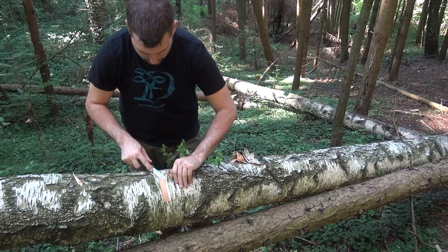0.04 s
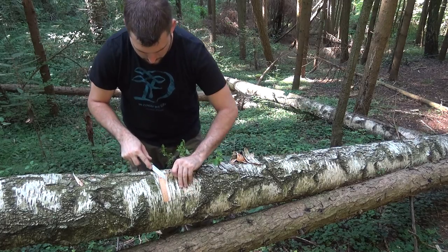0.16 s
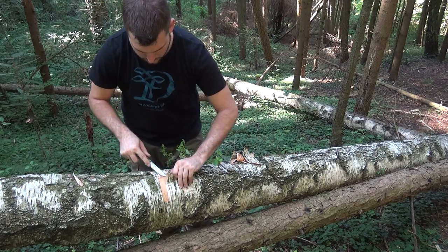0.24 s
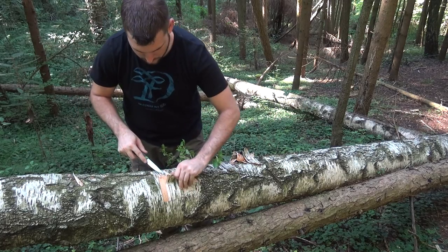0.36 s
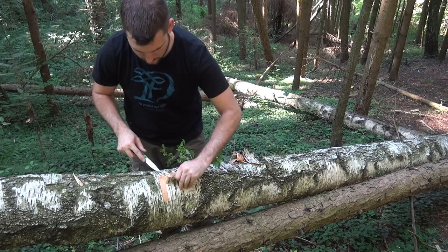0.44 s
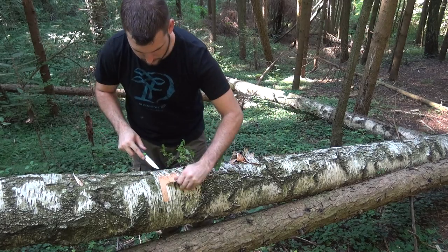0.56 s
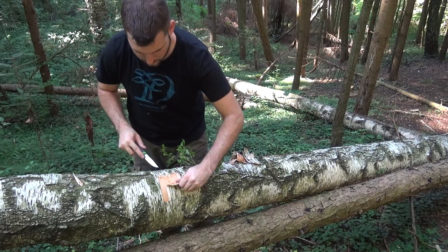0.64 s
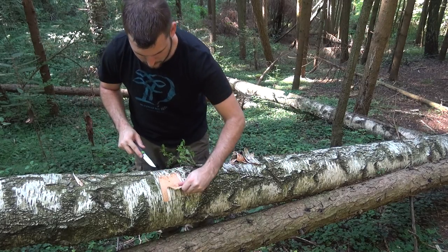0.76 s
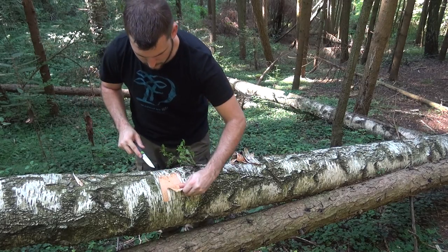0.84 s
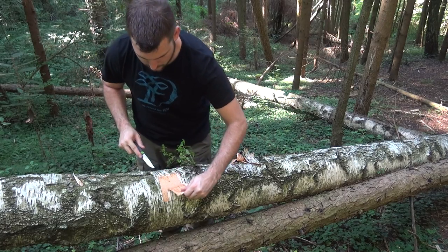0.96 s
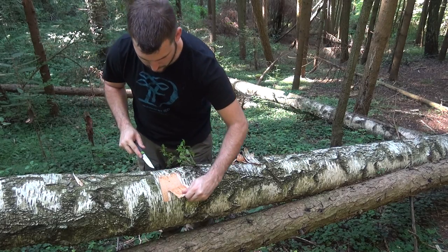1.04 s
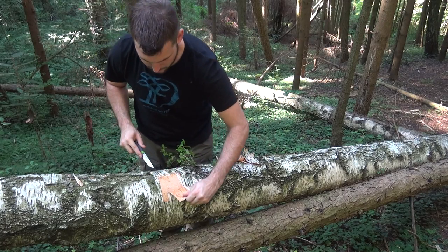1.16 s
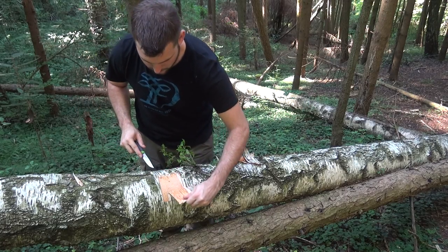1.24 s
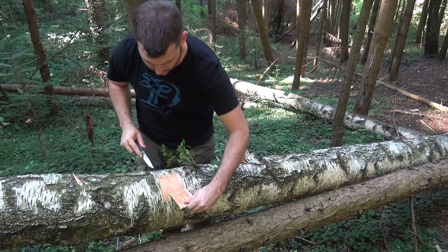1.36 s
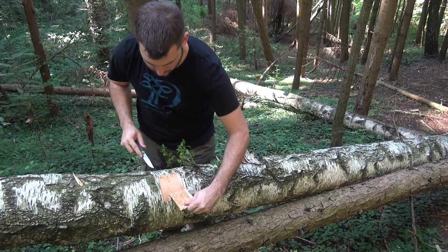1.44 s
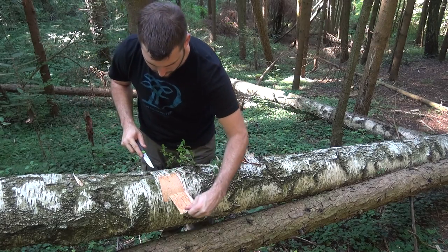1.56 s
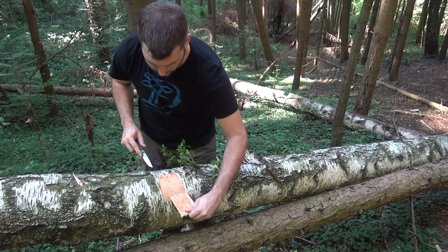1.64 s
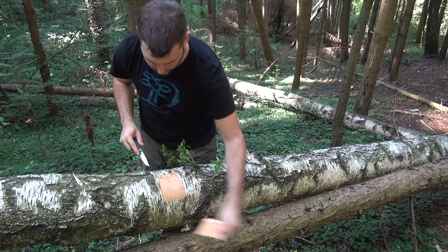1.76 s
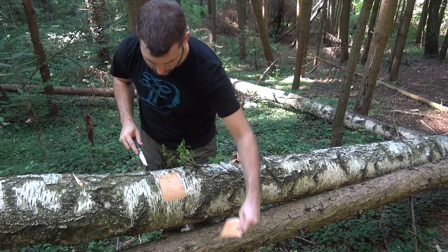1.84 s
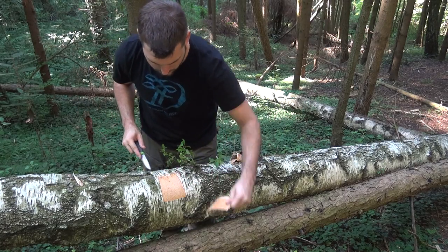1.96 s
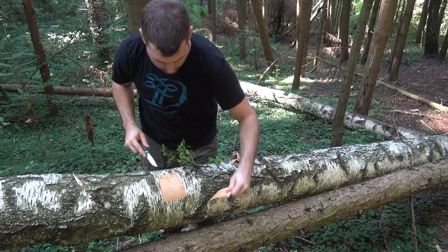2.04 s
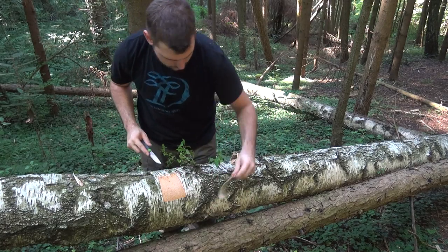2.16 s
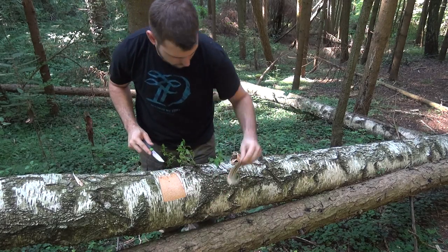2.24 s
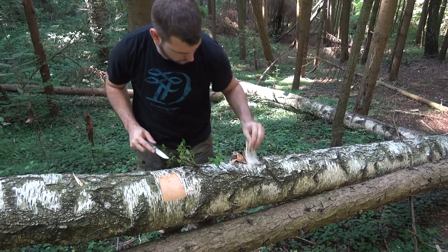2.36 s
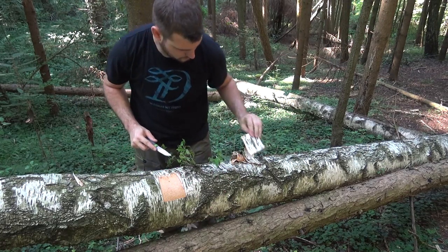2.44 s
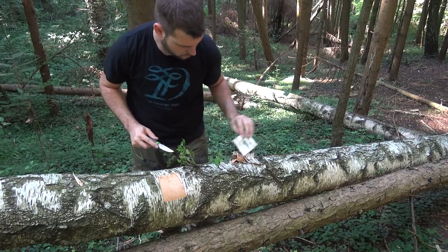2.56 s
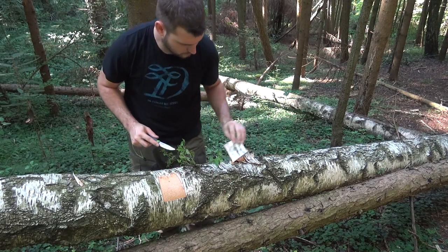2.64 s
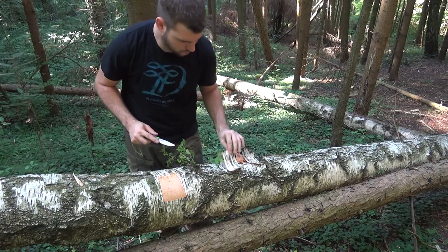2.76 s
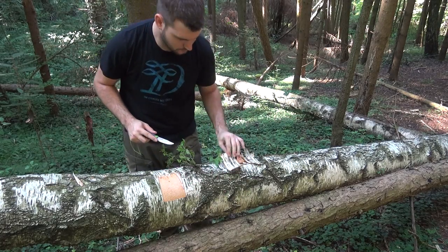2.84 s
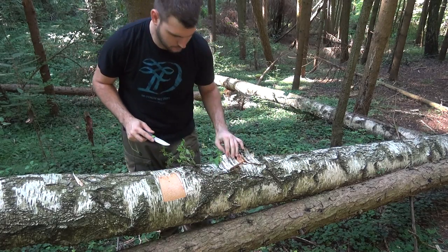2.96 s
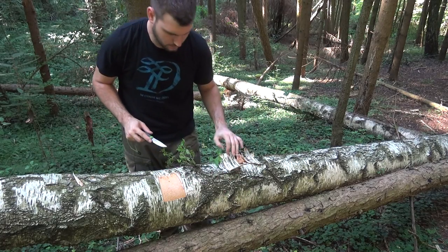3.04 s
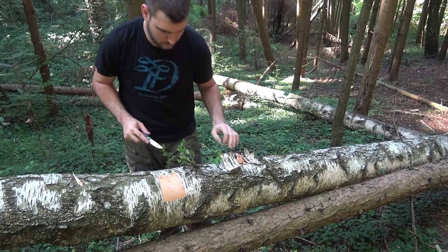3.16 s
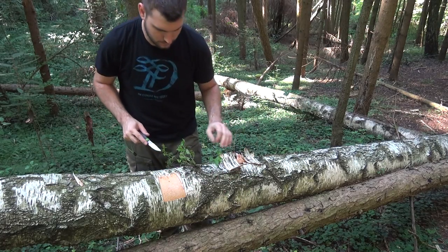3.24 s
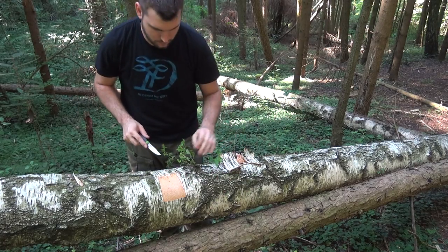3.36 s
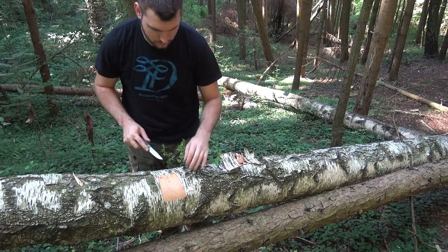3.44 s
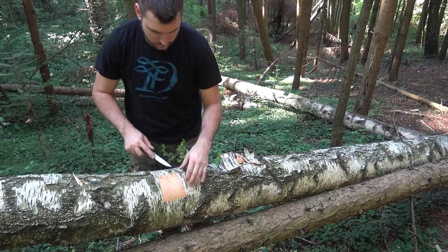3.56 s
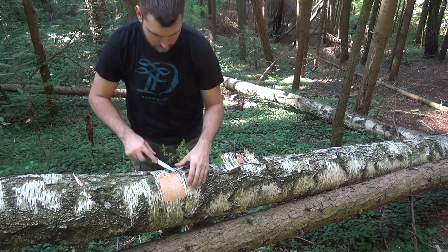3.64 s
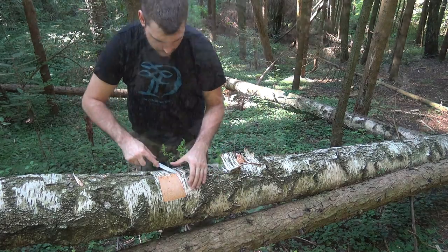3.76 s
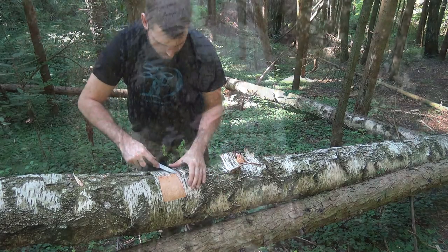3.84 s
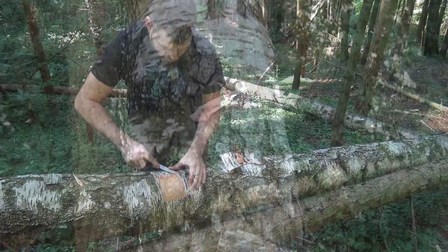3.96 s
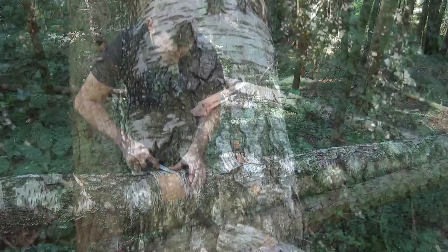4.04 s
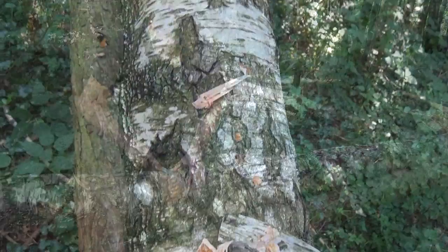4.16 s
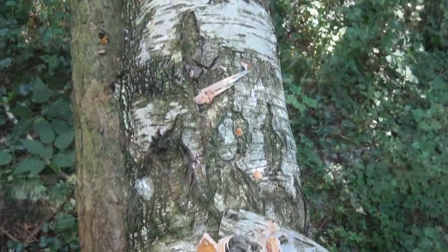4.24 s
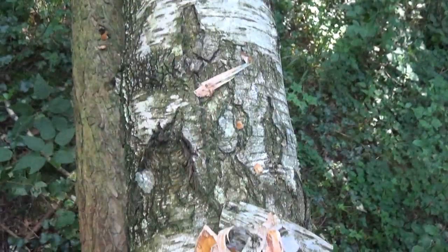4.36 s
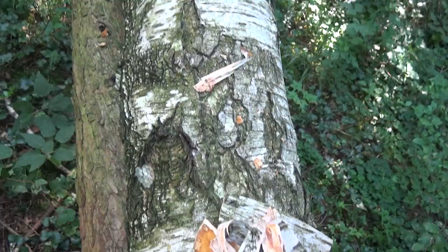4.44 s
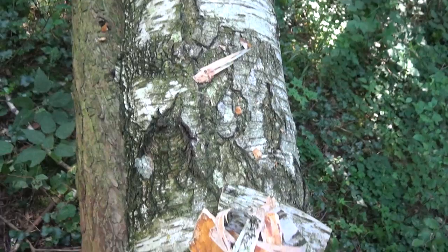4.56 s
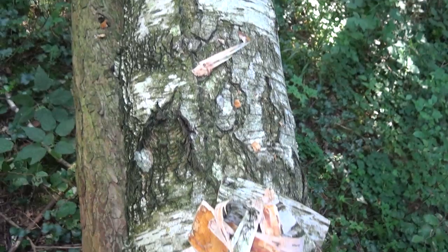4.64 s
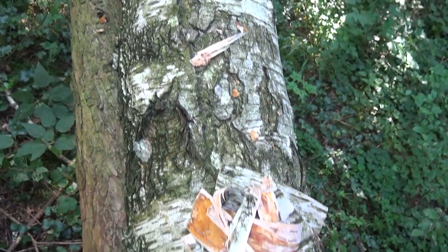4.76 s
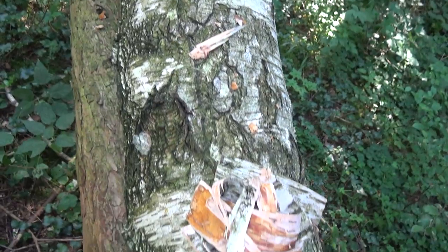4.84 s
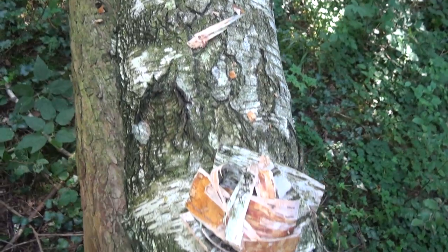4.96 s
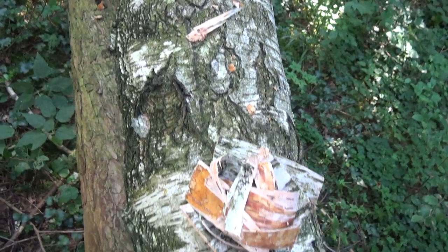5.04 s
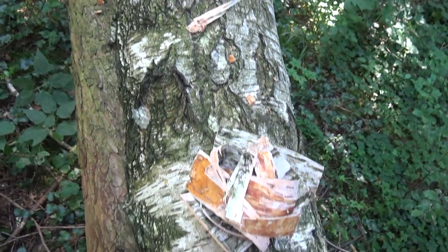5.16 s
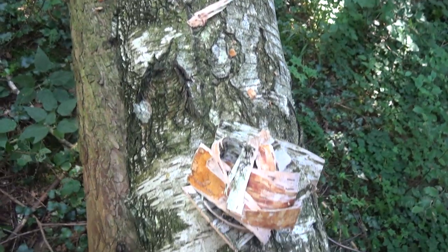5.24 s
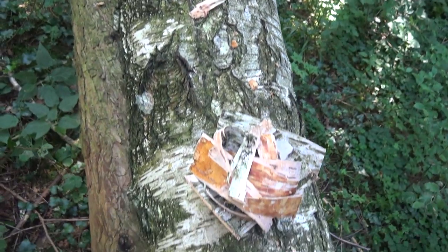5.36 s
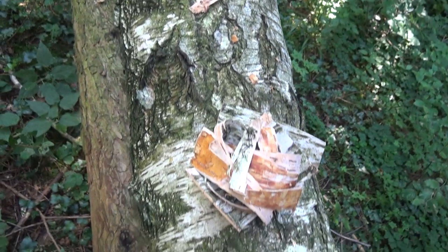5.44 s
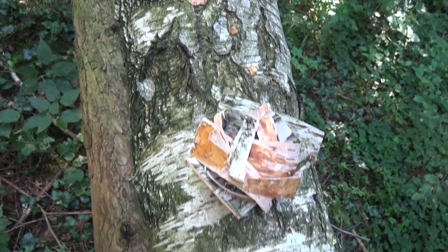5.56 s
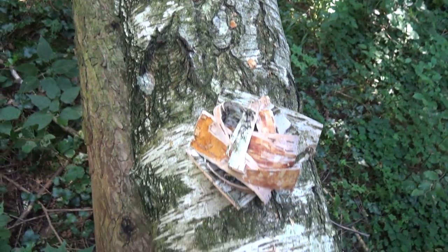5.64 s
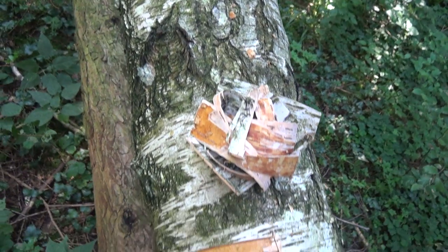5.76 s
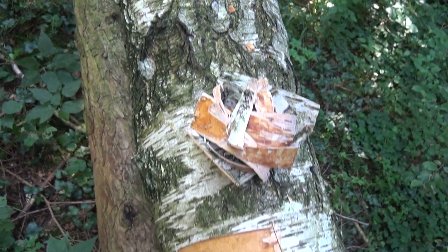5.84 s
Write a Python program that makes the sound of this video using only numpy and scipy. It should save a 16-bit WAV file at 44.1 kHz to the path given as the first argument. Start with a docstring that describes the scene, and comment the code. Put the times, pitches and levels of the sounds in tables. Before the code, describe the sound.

Outdoor stereo microphone near a fallen birch trunk. A knife and hand rasp, snap and tick the bark until a strip breaks away with a sharp dominating crack and short woody echo. Soft taps and scrapes follow, then another crisp snap. Clear rising bird whistles come early, high trills in the middle, three quick chips later. A faint far engine hums under the first airy background, which crossfades into a slightly hollow one.

```python
"""Peeling birch bark in the woods

A knife lifts a strip of birch bark off a fallen trunk: it ticks, fizzes, tears off with one loud crack, is
laid down, and the blade snaps in again. Pops, noise sprays and filtered grit make the bark; gliding sines
make small birds and a far engine; coloured stereo noise makes two forest airs, the second fading in under
the first, which fades out near the end. Decaying noise gives the wood's answer."""
import sys
import numpy as np
from scipy import signal
from scipy.fft import rfft, irfft, next_fast_len
from scipy.io import wavfile
from scipy.ndimage import map_coordinates

SR = 44100
rng = np.random.default_rng(int(sys.argv[2]) if len(sys.argv) > 2 else 0)


def bounce(signal):
    """Save signal as a 16-bit WAV file at the path given by the first command-line argument."""
    frames = np.transpose(np.atleast_2d(signal))
    limited = np.clip(frames, -1, 1)
    pcm = np.round(limited * 32767).astype(np.int16)
    wavfile.write(sys.argv[1], SR, pcm)


N = 260190

# Colour of each forest air: (frequency [Hz], level per Hz [dB])
AIR_FIRST = [(20, -10), (40, -8), (60, 0), (90, -1.5), (140, -9), (320, -11), (500, -17.5), (730, -16),
             (950, -21), (1150, -16.5), (2100, -21), (3100, -28.5), (7000, -23.5), (15500, -41.5)]
AIR_SECOND = [(12, -49), (20, -22.5), (60, 3), (198, -9), (310, -9), (377, -18.5), (558, -11.5), (849, -25),
              (1330, -11), (1480, -17.5), (1660, -14.5), (2990, -26.5), (3530, -27), (4060, -26),
              (16000, -32.5)]
# A faint hollow drone in the second air: (frequency [Hz], width [Hz], level [dB])
HOLLOW = [(622, 400, -9), (1089, 31, -3), (1328, 60, 1.5), (1693, 39, -6.5), (2170, 47, -14)]
# Likeness of left and right in each air: (frequency [Hz], correlation [-1 to 1])
ALIKE_FIRST = [(60, 0.81), (150, 0.83), (380, 0.3), (950, -0.0), (2380, 0.79), (5980, 0.21), (15000, 0)]
ALIKE_SECOND = [(60, 0.79), (180, 0.65), (550, -0.47), (1650, -0.42), (4970, 0.5), (15000, -0.066)]
# Balance of each air: (frequency [Hz], left minus right [dB])
LEAN_FIRST = [(60, -10.5), (110, -3.5), (200, -6), (380, -6.5), (700, -6.5), (1290, -9), (2380, -7),
              (4400, -6), (8120, 3), (15000, -17.5)]
LEAN_SECOND = [(60, -12.5), (110, -1.5), (200, -10), (380, -4.5), (700, -5.5), (1290, -7.5), (2380, -9),
               (4400, -5.5), (8120, 5), (15000, -12.5)]
# A far engine speeds up: (time [s], frequency [Hz], level [dB])
RUMBLE = [(.5, 59.5, -54), (2.1, 62, -58.5), (3.1, 71, -56.5), (4.3, 72, -54)]
# The near bird's whistle dips, then rises: (time into whistle [s], frequency [Hz], level [dB])
WHISTLE = [(0, 4340, -16), (.013, 3500, -12), (.028, 3290, -13), (.055, 4450, -2), (.09, 4795, -1.5),
           (.17, 5190, -2), (.197, 5580, -4), (.215, 6470, -7), (.224, 6900, -35)]
# Its falling afternote: (time into note [s], frequency [Hz], level [dB])
FALL = [(0, 6700, -18), (.012, 6900, -8), (.026, 8200, -10), (.04, 6900, -1), (.06, 5400, 2),
        (.09, 5350, -6), (.125, 5400, -29)]
# One row a repeat: (level [dB], pitch [factor], afternote relative to whistle [dB])
VERSES = [(-48, .96, -2.5), (-47, .985, -5), (-46.5, 0.98, -3.5), (-48, 0.98, -11.5)]
# Soft low shuffling: (time [s], length [s], level [dB])
SHUFFLES = [(.05, 0.45, -62), (.85, 0.34, -64.5), (3.45, .4, -60), (3.9, .55, -62.5)]
# Hand and blade rub over the bark: (time [s], length [s], level [dB])
SCRAPES = [(.125, 0.041, -52), (2.122, 0.052, -54), (2.367, 0.043, -58), (3.53, 0.77, -69),
           (4.16, 0.065, -55), (4.26, 0.33, -68)]
# Tugs at the strip rasp: (time [s], length [s], level [dB])
TUGS = [(.36, .17, -54.5), (.52, 0.15, -61), (1.095, 0.077, -54), (1.542, .1, -51), (1.738, 0.021, -39.5)]
# The loose strip slides to rest: (time [s], length [s], level [dB])
LAY_DOWN = [(2.786, 0.046, -50.5)]
# Bark snaps: a flake breaks off, and later the blade snaps into the bark; splinters and knock are relative to
# the snap: # (time [s], level [dB], pitch [Hz], splinters [dB], knock [dB], knock pitch [Hz])
SNAPS = [(0.7236, -17.5, 5840, -11, -21, 1745), (2.078, -26, 7300, -10.5, -30, 3000),
         (4.1855, -25, 7500, -2.5, -5.5, 2410)]
# Single fibres snap as the strip is pulled: (time [s], level [dB])
TICKS = [(.9406, -37.5), (1.103, -29), (1.1422, -36), (1.205, -27.5), (1.2696, -28), (1.5671, -26.5),
         (1.5978, -35), (1.6417, -36)]
# The strip breaks away in four jerks: (time [s], level [dB], pitch [Hz], rise to the peak [cycles])
BREAKS = [(1.7662, -2, 3910, 0.52), (1.7692, -22, 1900, .8), (1.7743, -11, 1840, 0.65),
          (1.7816, -10.5, 2750, 0.69)]
# Colour of tearing fibres: (frequency [Hz], level per Hz [dB])
FIBRES = [(500, -15), (1500, 0), (3800, -3.5), (5500, -4), (10000, -3.5), (12000, -13.5), (16000, -24)]
# Colour of the freed strip's shiver: (frequency [Hz], level per Hz [dB])
FLAP = [(80, -30.5), (200, 6), (420, -14), (700, 10), (1100, -16), (1700, -16), (3400, -2), (5000, -10),
        (10000, -34), (15000, -27)]
# Modes of the stiff strip, swelling as it comes free: (frequency [Hz], level [dB], time to the peak [s])
STRIP = [(108, -41.5, 0.0098), (198, -43, 0.0076), (638, -30.5, 0.0079), (854, -40, 0.011),
         (1500, -28, 0.0057), (1736, -27.5, 0.0047), (2050, -40, 0.013), (2340, -37, 0.012),
         (3215, -30, 0.0088), (4060, -28, 0.0028)]
# Birds further off, repeating one gliding note: (time [s], notes [count], period [s], length [s],
# frequency [Hz], glide [Hz], step a note [Hz], level [dB], step a note [dB])
TRILLS = [(1.841, 2, 0.22, .2, 8150, -3, -1, -74, 9), (2.272, 2, 0.18, 0.15, 6130, -380, 3, -67, 4.5),
          (2.608, 8, 0.096, 0.055, 7990, 602, -45, -48, -0.8),
          (2.561, 4, .096, .05, 4980, 250, -4, -61, 1.3), (2.931, 3, .117, .042, 4404, 450, 0, -59, 1),
          (4.775, 3, .455, 0.168, 3520, -49.5, -10, -68, 1)]
# Their lone notes: (time [s], length [s], frequency [Hz], glide [Hz], level [dB])
NOTES = [(2.471, .11, 9300, -790, -55), (3.857, 0.24, 7200, -190, -66.5), (4.17, 0.255, 5195, -41, -64.5),
         (5.025, .14, 3980, -240, -72), (5.486, .1, 4720, -500, -69), (5.81, .08, 3530, 19, -68),
         (5.836, .051, 6880, 1320, -60)]
# Strip and blade touch the trunk: (time [s], level [dB], pitch [Hz])
TAPS = [(2.7972, -33.5, 4200), (2.8098, -28.5, 3200), (3.5997, -36, 8000), (3.757, -39.5, 2087)]
# A hoarse chip, a flick up and a drop: (time into chip [s], frequency [Hz], level [dB])
CHIP = [(0, 3280, -22), (.014, 4540, -8.5), (.021, 6590, -3.5), (.025, 7730, -12), (.035, 6600, 4),
        (.041, 6300, -5), (.045, 5900, -32)]
# The close bark sounds are dulled above about 11 kHz: (frequency [Hz], level [dB])
BARK_COLOUR = [(100, -3), (9000, -2), (10500, -1), (12000, -6), (16000, -17)]
# The two microphone ports differ in colour: (frequency [Hz], left minus right [dB])
PORTS = [(200, -1.5), (2000, -2), (6000, 1), (8200, 4.5), (10000, 10.5), (12000, -5.5), (16000, -16)]
# How long the wood answers: (frequency [Hz], t60 [s])
FOREST = [(200, 0.44), (1500, 0.76), (5000, 0.78), (8000, 0.78), (14000, 0.18)]

# The first air holds, then fades out; the second fades in and holds
FIRST_AIR_DB, FIRST_ENDS_S, FIRST_FADE_S = -54, 4.674, 0.29
SECOND_AIR_DB, SECOND_STARTS_S, SECOND_FADE_S = -55, 3.41, 0.19
AIR_SWAY_DB = .7
# Whistle and afternote repeat at an even pace
SONG_START_S, SONG_PERIOD_S, FALL_AFTER_S = 0.0091, .4375, .285
TUG_HZ, SCRAPE_HZ, LAY_DOWN_HZ, SHUFFLE_HZ = 9500, 5000, 1287, 263
SNAP_CYCLES, SNAP_T60_S = 0.55, 0.015
# The duller knock of the bark under a flake
KNOCK_CYCLES, KNOCK_SPRAY_DB, KNOCK_T60_S = 2.1, -4, 0.028
TICK_HZ, TICK_SPRAY_DB, TICK_T60_S = 9600, -10.5, 0.023
# A finer split runs just ahead of each jerk, higher in pitch; then the strip recoils
EDGE_LEAD_S, EDGE_DB, EDGE_RATIO, EDGE_CYCLES = .0002, -5, 2.48, .9
RECOIL_LAG_S, RECOIL_DB, RECOIL_HZ, RECOIL_CYCLES = .00005, -13, 1726, 1.9
TAP_CYCLES, TAP_SPRAY_DB, TAP_T60_S = 0.42, -15, 0.069
# Each chip sinks by CHIP_SAG, a share of the first chip's pitch
CHIP_START_S, CHIP_PERIOD_S, CHIP_DB, CHIP_SAG = 4.586, .0985, -45.5, 0.0122
TOP_HZ = 15900


def amp(db):
    """Decibels to gain."""
    return 10 ** (np.asarray(db) / 20)


def unit(x):
    """x at rms 1."""
    return x / np.sqrt(np.mean(x ** 2) + 1e-20)


def along(points, hz):
    """(Hz, value) points read on a log frequency axis."""
    f, v = np.transpose(points)
    return np.interp(np.log(hz + 1), np.log(f + 1), v)


def curves(rows, t):
    """Each column after the time, read at times t."""
    s, *cols = np.transpose(rows)
    return [np.interp(t, s, c) for c in cols]


def clock(length):
    """Sample times over a length in seconds."""
    return np.arange(max(int(length * SR), 2)) / SR


def wobble(rate, size=N):
    """A smooth random curve, rate knots a second."""
    knots = rng.standard_normal(int(size * rate / SR) + 4)
    return map_coordinates(knots, [np.arange(size) * rate / SR])


def filtered(x, response):
    """x times a complex response of frequency."""
    n = x.shape[-1]
    m = next_fast_len(n + 8192)  # room for ringing past the end
    return irfft(rfft(x, m) * response(np.fft.rfftfreq(m, 1 / SR)), m)[..., :n]


def resonance(f, hz, width):
    """Causal response of one resonance."""
    return 1j * f * width / (hz * hz - f * f + 1j * f * width)


def add(track, s, x):
    """Mix x into the track from time s."""
    start = max(round(s * SR), 0)
    part = track[start:start + len(x)]
    part += x[:len(part)]


def grit(t, spiky_db):
    """Countless tiny fractures of very unequal size, as noise with a random level each sample."""
    sizes = amp(spiky_db * rng.standard_normal(len(t)))
    return unit(rng.standard_normal(len(t)) * sizes)


def pop(t, hz, cycles):
    """One fracture: a brief pressure swing whose envelope peaks at 1 after the given cycles."""
    u = t * hz / cycles
    return u * np.exp(1 - u) * np.sin(2 * np.pi * hz * t)


def place(x, lean_db, lead_ms):
    """A source louder and earlier at one microphone port (positive = left)."""
    side = np.array([[.5], [-.5]])

    def ports(f):
        level = amp(side * (lean_db + along(PORTS, f)))
        return level * np.exp(2j * np.pi * f * side * lead_ms / 1000)

    return filtered(x, ports)


def forest(x, lean_db, early_db, early_t60):
    """Scatter from near trunks, then the long soft answer of the wood, as decaying stereo noise."""
    hz, t, z = signal.stft(rng.standard_normal((2, SR)), SR, nperseg=256)
    late = amp(-60 * t / along(FOREST, hz)[:, None])
    early = amp(early_db - 60 * t / early_t60)
    tail = signal.istft(z * (late + early) * (t > 0), SR, nperseg=256)[1]
    tail = tail / np.linalg.norm(tail[0])
    return signal.fftconvolve(x[None], tail, axes=1)[:, :N] * amp([[lean_db / 2], [-lean_db / 2]])


def spots():
    """Gains of the two spots in the forest, which overlap for about a second."""
    t = np.arange(N) / SR
    first = np.clip((FIRST_ENDS_S - t) / FIRST_FADE_S, 0, 1)
    second = np.clip((t - SECOND_STARTS_S) / SECOND_FADE_S, 0, 1)
    return first, second


def rush(colour, alike, lean):
    """Stereo noise of rms 1: a mid-side mix sets its likeness, a level tilt its balance."""
    def mid_side(f):
        turn = np.arccos(np.clip(along(alike, f), -1, 1)) / 2
        return colour(f) * np.array([np.cos(turn), np.sin(turn)])

    def balance(f):
        return amp([along(lean, f) / 2, -along(lean, f) / 2])

    mid, side = filtered(rng.standard_normal((2, N)), mid_side)
    return unit(filtered(np.array([mid + side, mid - side]), balance))


def air(drone_db):
    """Quiet, slightly swaying forest air at two spots; the second carries a hollow drone of noise bands."""
    def hollow(f):
        return sum(amp(db) * abs(resonance(f, hz, width)) ** 2 for hz, width, db in HOLLOW)

    first_gain, second_gain = spots()
    first = rush(lambda f: amp(along(AIR_FIRST, f)), ALIKE_FIRST, LEAN_FIRST)
    second = rush(lambda f: amp(along(AIR_SECOND, f)), ALIKE_SECOND, LEAN_SECOND)
    drone = rush(hollow, ALIKE_SECOND, LEAN_SECOND)
    first_level = first_gain * amp(FIRST_AIR_DB + AIR_SWAY_DB * wobble(6.42))
    second_level = second_gain * amp(SECOND_AIR_DB + AIR_SWAY_DB * wobble(6.0))
    return first_level * first + second_level * (second + amp(drone_db) * drone)


def engine(second_db, flutter_db):
    """A far engine's low note and its octave, fluttering on its way through the trees to the first spot."""
    hz, db = curves(RUMBLE, np.arange(N) / SR)
    phase = 2 * np.pi * np.cumsum(hz + 3 * wobble(18)) / SR
    note = np.sin(phase) + amp(second_db) * np.sin(2 * phase)
    return spots()[0] * amp(db + flutter_db * wobble(6.1)) * note


def peel(level_db, clump_db, fibre_db):
    """As the strip is pulled, its underside fizzes in clumps and random single fibres tick."""
    t = np.arange(N) / SR
    pull = np.interp(t, [0, .4, 1.55, 1.76, 1.78], [0.68, 1, 0.73, 0.61, 0.1])
    clumps = amp(clump_db * (wobble(25) + wobble(130)))
    fizz = unit(filtered(grit(t, spiky_db=5.0) * clumps, lambda f: resonance(f, 10600, 6800) ** 2))
    lets_go = rng.random(N) < 90 * pull * clumps / SR  # chance per sample
    impulses = lets_go * rng.uniform(-1, 1, N)
    fibres = unit(filtered(impulses, lambda f: resonance(f, 6200, 4700) ** 2))
    return amp(level_db) * pull * fizz + amp(fibre_db) * fibres


def song(shape, calls, overtone_db, waver, waver_rate):
    """A bird repeats one whistled shape, never quite alike; a fast pitch waver makes it hoarse."""
    out, t = np.zeros(N), clock(shape[-1][0])
    hz, shape_db = curves(shape, t)
    overtone = amp(overtone_db) / (1 + (hz / 4600) ** 12)  # the throat passes only the low notes' octave
    for s, db, pitch in calls:
        wavering_hz = hz * pitch * (1 + waver * wobble(waver_rate, size=len(t)))
        phase = 2 * np.pi * np.cumsum(wavering_hz) / SR
        level = np.sqrt(2) * amp(db + shape_db + 2.56 * wobble(86.4, size=len(t)))
        add(out, s, level * (np.sin(phase) + overtone * np.sin(2 * phase)))
    return out


def verses():
    """The near bird repeats a clear rising whistle and a hoarse afternote."""
    rows = [(SONG_START_S + k * SONG_PERIOD_S, *verse) for k, verse in enumerate(VERSES)]
    rises = [(s, db, pitch) for s, db, pitch, fall_db in rows]
    falls = [(s + FALL_AFTER_S, db + fall_db, pitch) for s, db, pitch, fall_db in rows]
    out = song(WHISTLE, rises, overtone_db=-34, waver=0.0055, waver_rate=180)
    return out + song(FALL, falls, overtone_db=-30, waver=.025, waver_rate=900)


def scrapes(strokes, hz):
    """Surfaces slide and part in clumps of tiny grains, heard as resonant grit."""
    out = np.zeros(N)
    for s, length, db in strokes:
        t = clock(length)
        grains = unit(filtered(grit(t, spiky_db=9.5), lambda f: resonance(f, hz, 1.6 * hz) ** 2))
        add(out, s, amp(db) * grains * signal.windows.tukey(len(t), .8))
    return out * unit(amp(2.5 * wobble(160)))  # the grip comes and goes


def snap(hz, cycles, spray_db, t60):
    """Bark lets go with a pop and a short spray of splinters."""
    t = clock(0.035)
    spray = unit(filtered(grit(t, spiky_db=4), lambda f: resonance(f, hz, 1.1 * hz)))
    return pop(t, hz, cycles) + spray * amp(spray_db - 60 * t / t60)


def snaps():
    """Bark snaps brightly and knocks the wood beneath: first a flake breaking off, then the blade snapping in."""
    out = np.zeros(N)
    for s, db, hz, spray_db, knock_db, knock_hz in SNAPS:
        add(out, s, amp(db) * snap(hz, SNAP_CYCLES, spray_db, SNAP_T60_S))
        add(out, s, amp(db + knock_db) * snap(knock_hz, KNOCK_CYCLES, KNOCK_SPRAY_DB, KNOCK_T60_S))
    return out


def ticks():
    """The loudest fibres snap during the pull, all alike in pitch."""
    out = np.zeros(N)
    for s, db in TICKS:
        add(out, s, amp(db) * snap(TICK_HZ, SNAP_CYCLES, TICK_SPRAY_DB, TICK_T60_S))
    return out


def tear(centre, level_db, rise, fall, spectrum):
    """A run of fractures that builds to a moment and dies (rise and fall are t60 in seconds)."""
    out, t = np.zeros(N), clock(.2) - .1  # time 0 is the loudest moment
    run = unit(filtered(grit(t, spiky_db=4), lambda f: amp(along(spectrum, f))))
    add(out, centre - .1, run * amp(level_db - 60 * np.maximum(-t / rise, t / fall)))
    return out


def crack():
    """Tearing fibres swell, the strip breaks in a few jerks and shivers free."""
    out, t = np.zeros(N), clock(.03)
    for s, db, hz, cycles in BREAKS:
        add(out, s - EDGE_LEAD_S, amp(db + EDGE_DB) * pop(t, EDGE_RATIO * hz, EDGE_CYCLES))
        add(out, s, amp(db) * pop(t, hz, cycles))
        add(out, s + RECOIL_LAG_S, amp(db + RECOIL_DB) * pop(t, RECOIL_HZ, RECOIL_CYCLES))
    out += tear(1.766, level_db=-19.5, rise=.019, fall=.019, spectrum=FIBRES)
    out += tear(1.7818, level_db=-25, rise=.003, fall=.014, spectrum=FIBRES)
    return out + tear(1.781, level_db=-30, rise=.04, fall=.04, spectrum=FLAP)


def strip():
    """The freed strip's modes swell and die within moments, heard dry."""
    out, t = np.zeros(N), clock(.12)
    for hz, db, swell in STRIP:
        u = t / swell
        envelope = (u * np.exp(1 - u)) ** 2
        add(out, BREAKS[0][0], amp(db) * envelope * np.sin(2 * np.pi * (hz * t + rng.random())))
    return out


def far_birds(waver, flicker_db):
    """Short wavering glides from high in the trees, alone or in trills; high notes are the least steady."""
    out = np.zeros(N)
    calls = list(NOTES)
    for s, count, period, length, hz, glide_hz, step_hz, db, step_db in TRILLS:
        for k in range(round(count)):
            calls.append((s + k * period, length, hz + k * step_hz, glide_hz, db + k * step_db))
    for s, length, start_hz, glide_hz, db in calls:
        t = clock(length)
        unsteady = 1 + waver * start_hz / 8000 * wobble(250, size=len(t))
        hz = (start_hz + glide_hz * t / length) * unsteady
        level = amp(db + flicker_db * wobble(73, size=len(t))) * signal.windows.tukey(len(t), .4)
        add(out, s, level * np.sin(2 * np.pi * np.cumsum(hz) / SR))
    return out


def taps():
    """Light touches on the trunk, each with a short crumbling tail."""
    out = np.zeros(N)
    for s, db, hz in TAPS:
        add(out, s, amp(db) * snap(hz, TAP_CYCLES, TAP_SPRAY_DB, TAP_T60_S))
    return out


def chipping(count):
    """A quick, even run of hoarse chips that sinks a little."""
    calls = [(CHIP_START_S + k * CHIP_PERIOD_S, CHIP_DB, 1 - k * CHIP_SAG) for k in range(count)]
    return song(CHIP, calls, overtone_db=-7, waver=.045, waver_rate=1200)


def scene():
    """The work is close and nearly dry; the birds sit to the right, wrapped in the wood's answer."""
    rubbing = scrapes(TUGS, TUG_HZ) + scrapes(SCRAPES, SCRAPE_HZ)
    rubbing += scrapes(LAY_DOWN, LAY_DOWN_HZ) + scrapes(SHUFFLES, SHUFFLE_HZ)
    breaking = crack() + snaps() + ticks() + peel(level_db=-68, clump_db=3.5, fibre_db=-69)
    bark = filtered(breaking + taps() + rubbing, lambda f: amp(along(BARK_COLOUR, f)))
    whistles, chips = verses(), chipping(count=3)
    far = far_birds(waver=.011, flicker_db=3)

    out = place(bark + strip(), lean_db=-5, lead_ms=0.019)
    out += amp(-18) * forest(bark, lean_db=-9.0, early_db=12, early_t60=0.14)
    out += amp(-2.5) * place(whistles, lean_db=-10.5, lead_ms=.003)
    out += amp(-3.5) * forest(whistles, lean_db=-13, early_db=-8.5, early_t60=0.049)
    out += amp(-2) * place(chips, lean_db=-17.5, lead_ms=0.045)
    out += amp(-3.5) * forest(chips, lean_db=-9.5, early_db=2, early_t60=0.23)
    out += amp(-4.5) * place(far, lean_db=-13.5, lead_ms=0.025)
    out += amp(-4) * forest(far, lean_db=-6.5, early_db=-12, early_t60=0.13)
    rumble = place(engine(second_db=-22.0, flutter_db=2), lean_db=-4.5, lead_ms=0)
    return out + air(drone_db=-3.5) + rumble


def record(dry):
    """A very steep low-pass removes the treble above the band limit."""
    return filtered(dry, lambda f: 1 / (1 + (f / TOP_HZ) ** 120))


dry = scene()
out = record(dry)
bounce(out)
```